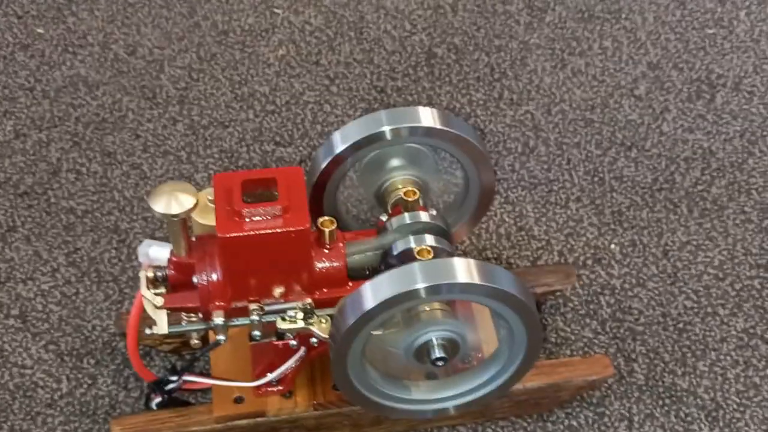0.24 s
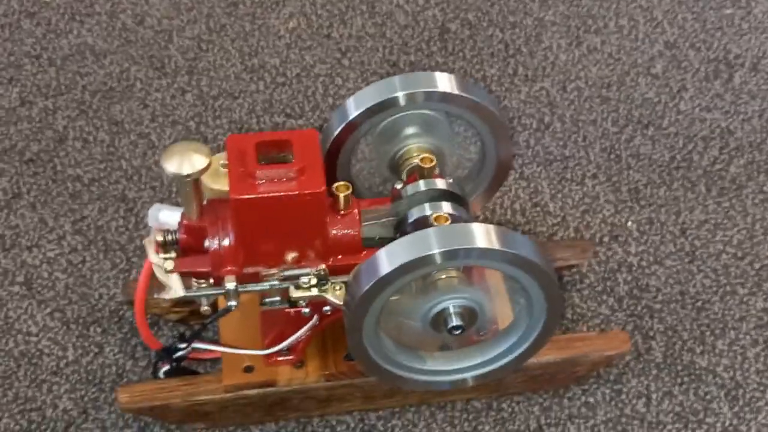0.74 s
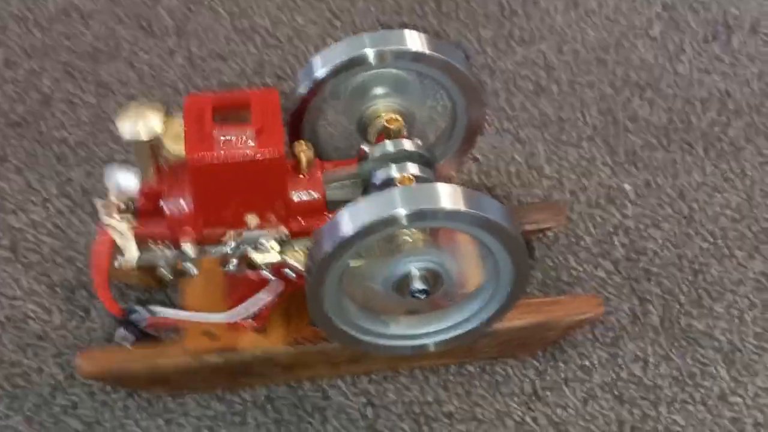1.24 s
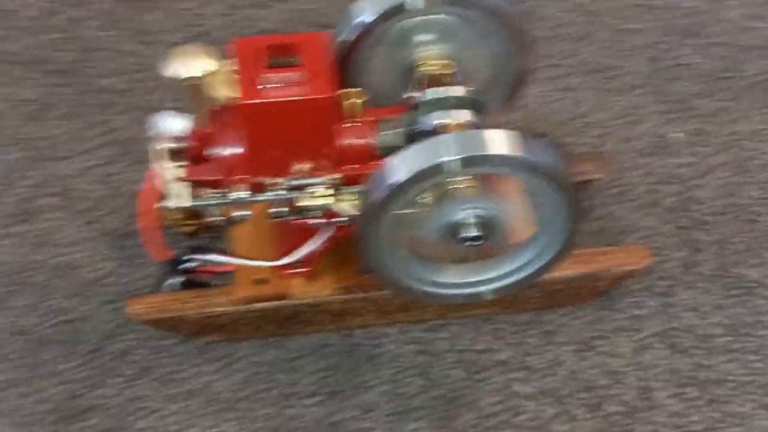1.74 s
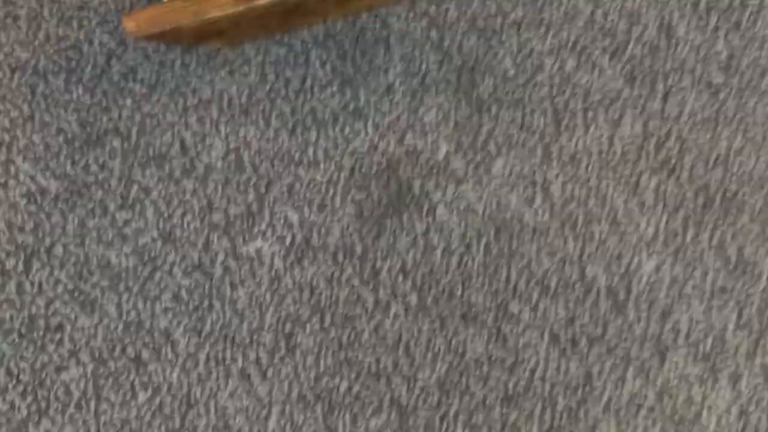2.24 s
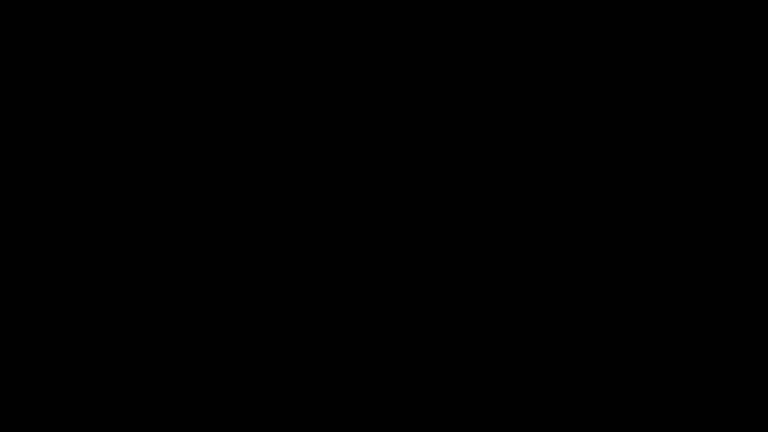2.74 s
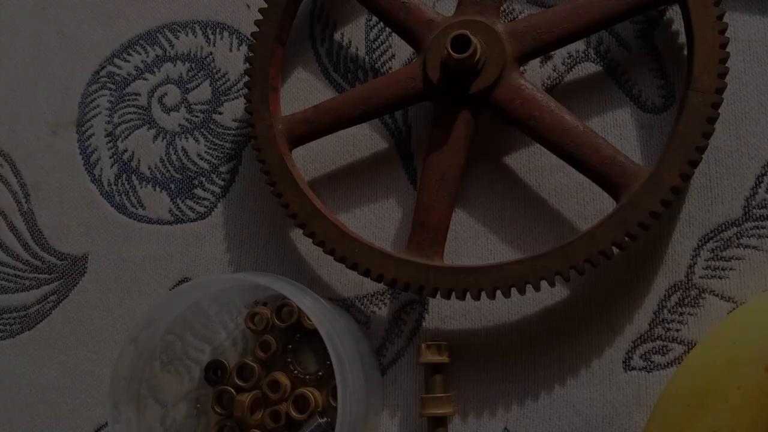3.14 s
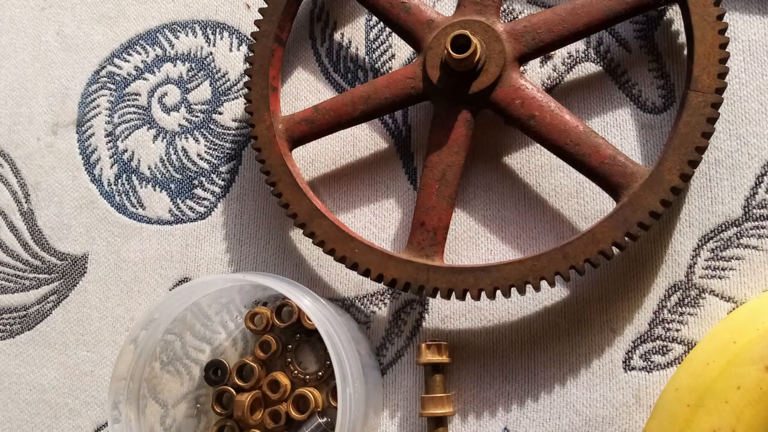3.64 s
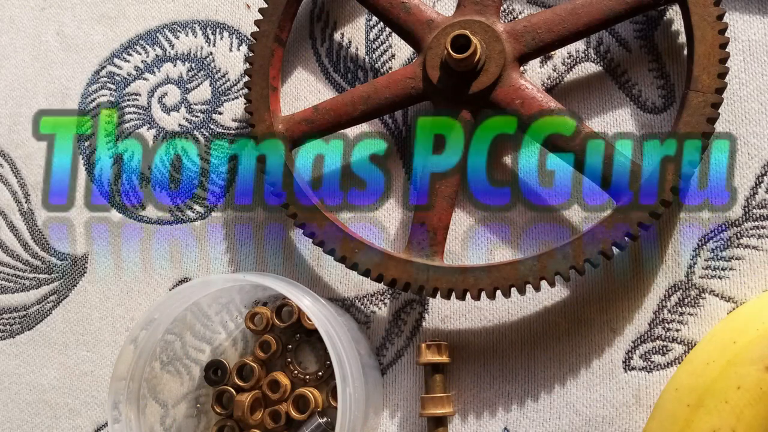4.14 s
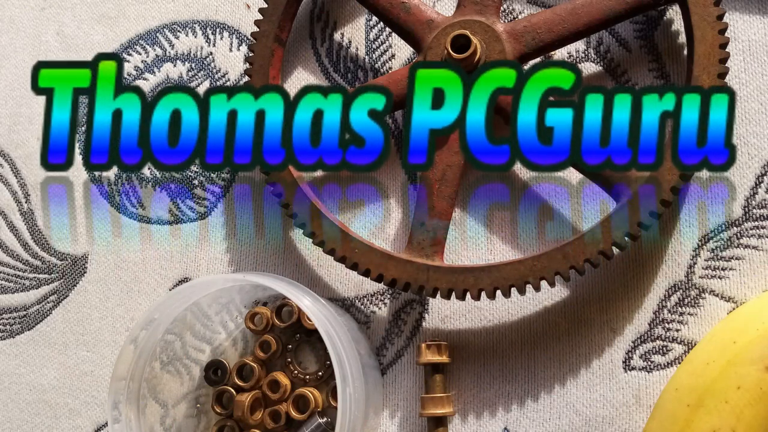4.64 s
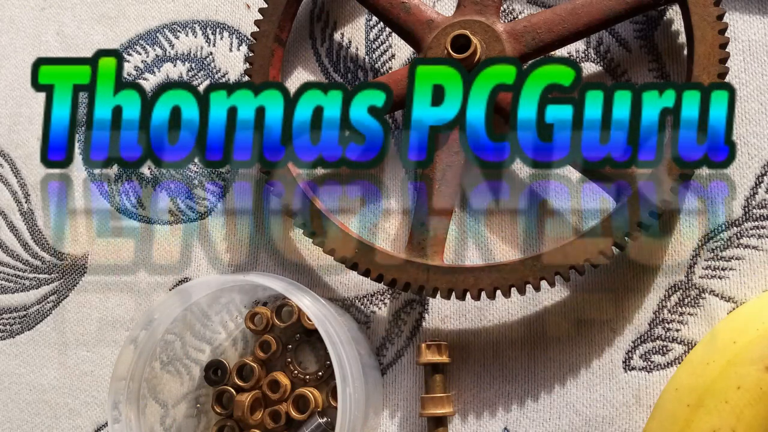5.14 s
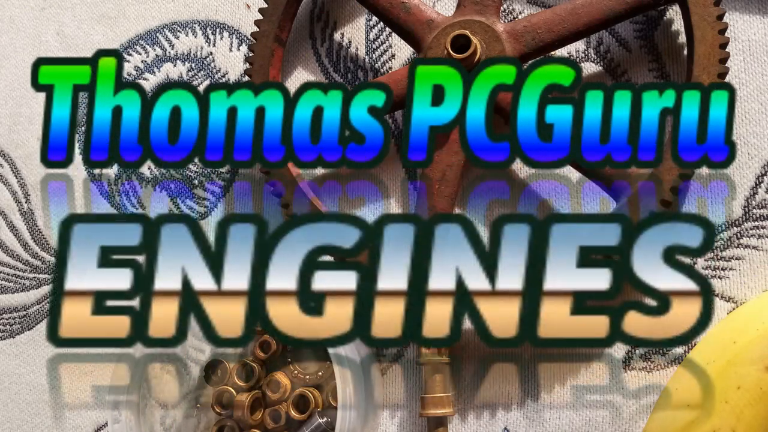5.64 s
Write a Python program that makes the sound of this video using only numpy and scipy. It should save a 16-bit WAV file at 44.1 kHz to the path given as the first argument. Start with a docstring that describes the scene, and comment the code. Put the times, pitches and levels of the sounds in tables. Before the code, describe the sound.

A model hit-and-miss engine runs on carpet indoors, close to the right microphone of a handheld camera. Faint slowing coasting leads to soft accelerating chuffs, then crisp valve-gear ticking with a rhythmic swish. Fingers knock and rub the camera case, ticking slows, and a dozen sharp pops speed the engine up before it coasts and ticks again. The left side stays nearly silent apart from handling and faint room sound.

```python
"""Indoors, on a carpet: a model hit-and-miss engine runs close to the right port of a hand-held camera.
It coasts, its push rod and valve gear ticking once a cycle (short coloured noise and damped frame modes),
then fires a run of strokes and speeds up again: soft noise chuffs while the exhaust points away, sharp pops
of ringing port, low blast and gas jet when it faces the camera. Moving parts swish in step with the crank.
Fingers knock and rub on the case: damped shell modes and noise."""
import sys
import numpy as np
from scipy import signal
from scipy.fft import rfft, irfft, next_fast_len
from scipy.io import wavfile
from scipy.ndimage import uniform_filter1d

SR = 44100
rng = np.random.default_rng(int(sys.argv[2]) if len(sys.argv) > 2 else 0)


def store_wav(level_fs):
    """Save 16-bit WAV to argv[1]."""
    pcm = np.round(np.clip(np.atleast_2d(level_fs), -1, 1) * 32767)
    wavfile.write(sys.argv[1], SR, pcm.T.astype(np.int16))


N = 259749
T = np.arange(SR // 3) / SR  # time since a blow [s]
NOW = np.arange(N) / SR  # time in the scene [s]
FULL_HZ = 16  # full speed [cycles per s]
AIR_HZ = 7500  # the treble above this has its own level [Hz]

# firing strokes: (time [s], strength [dB])
FIRING = [(.702, -14.5), (.811, -15), (.918, -16), (1.017, -15.5), (1.105, -11.5), (1.181, -10),
          (1.256, -10.5), (1.325, -6), (1.386, -5.5), (1.449, -7), (3.4153, -8), (3.5321, -7),
          (3.6448, -7.5), (3.7439, -7), (3.8335, -7.5), (3.9156, -8.5), (3.992, -7), (4.065, -6),
          (4.1339, -8.5), (4.2004, -10.5), (4.2636, -11), (4.386, -11.5)]
# aim of the exhaust, away at first and later at the camera: (time [s], direct pop [dB], chuff [dB])
AIM = [(1.5, -50, -18.5), (3.4, 0, -26.5), (4.4, 0, -27)]
# the valve gear heard from the moving camera:
# (time [s], latch [dB], clack [dB], frame ring [dB], brightness [dB])
VIEW = [(0, -54, -54, -68, -6), (.6, -53, -52, -47, -8.5), (1.5, -21, -26, -30, -4),
        (1.67, -13.5, -23.5, -37, -5), (1.83, -27.5, -33, -39, -4), (2.15, -14.5, -17.5, -25.5, -6),
        (2.6, -21.5, -19.5, -22.5, -5.5), (2.9, -23.5, -19.5, -32.5, -10.5), (3.3, -25.5, -18, -26.5, -10),
        (4, -27, -39, -16.5, -5), (4.38, -30, -26, -30.5, -4), (4.56, -17.5, -22.5, -26.5, -0.5),
        (4.85, -18.5, -28.5, -25, -6.5), (5.15, -22.5, -25, -27.5, 1.5), (5.6, -20.5, -21.5, -27, 4.5),
        (5.88, -19.5, -19, -30, 1)]
# colour of the valve gear landing: (frequency [Hz], relative density [dB per Hz])
CLACK = [(550, -45), (850, -9), (1200, -4), (2200, 14.5), (2900, -9), (3700, 8), (4400, -5), (5300, 9),
         (6500, -8.5), (7600, 1.5), (9000, -1.5), (12000, 3), (16000, -6.5)]
# colour of the latch and the push rod: (frequency [Hz], relative density [dB per Hz])
LATCH = [(550, -23), (850, -20), (1150, 8), (1700, -6), (2300, 6), (3000, -0.5), (3800, 8.5), (4700, -13),
         (5800, 10.5), (6700, 15), (7500, -14), (9000, -9), (12000, -5.5), (16000, -11.5)]
# dull wash of engine air in the room: (frequency [Hz], relative density [dB per Hz])
WASH = [(60, -11), (110, 14), (180, -2), (260, 5), (400, -7.5), (700, -9), (1400, -8), (2000, -7.5),
        (3000, -24), (5000, -11), (8000, -23), (16000, -22)]
# low modes of the camera case: (frequency [Hz], level [dB], t60 [s])
CASE = [(66.6, -5.5, 0.12), (89.5, -3, 0.18), (182, -4, 0.039)]
# creak of the shell under a finger: (frequency [Hz], relative density [dB per Hz])
CRACKLE = [(300, -14), (1000, 5.5), (1800, -0.5), (2500, 3), (3400, 8), (4000, -11), (4700, -15),
           (6500, -4), (15000, -46)]


def amp(db):
    """dB to gain."""
    return 10 ** (np.asarray(db) / 20)


def unit(x):
    """Scale to rms 1."""
    return x / np.sqrt(np.mean(x ** 2) + 1e-20)


def along(points, hz):
    """(Hz, value) points read on a log frequency axis."""
    f, v = np.transpose(points)
    return np.interp(np.log(hz + 1), np.log(f), v)


def at(curve, s):
    """The columns of a curve at a time."""
    times, *cols = np.transpose(curve)
    return [np.interp(s, times, c) for c in cols]


def noise(spectrum, size, lo=0, hi=SR):
    """Coloured noise of rms 1 between two frequencies."""
    m = next_fast_len(size)
    hz = np.fft.rfftfreq(m, 1 / SR)
    gain = amp(along(spectrum, hz)) * (hz >= lo) * (hz < hi)
    return unit(irfft(rfft(rng.standard_normal(m)) * gain, m)[:size])


def fade(t60):
    """Exponential decay by 60 dB in t60 seconds."""
    return np.exp(-np.log(1000) * T / t60)


def swell(length, rise, t60):
    """Opens, holds for a length of time and dies away."""
    return (1 - np.exp(-T / rise)) * np.exp(-np.log(1000) * np.maximum(T - length, 0) / t60)


def onset(rise):
    """A soft start, as a body takes up a push."""
    return 1 - np.exp(-(T / rise) ** 2)


def ring(modes, scatter_db, detune):
    """Damped modes, a little different in level and pitch at every blow."""
    out = np.zeros(len(T))
    for hz, db, t60 in modes:
        gain = amp(db + scatter_db * rng.normal())
        mode_hz = hz * (1 + detune * rng.normal())
        out += gain * fade(t60) * np.sin(2 * np.pi * mode_hz * T)
    return out


def add(track, s, sound):
    """Mix a sound in at a time."""
    i = max(round(s * SR), 0)
    space = track[..., i:i + sound.shape[-1]]
    space += sound[..., :space.shape[-1]]


def coasting_ticks():
    """Between firings the flywheels lose speed to steady friction and to drag that grows with speed."""
    # spells of coasting:
    # (first tick [s], rate [cycles per s], bearing friction [Hz per s], number of cycles)
    spells = [(.0629, 10.56, 3.25, 6), (1.5081, 16.512, 3.21, 23), (4.3236, 16.1, 3.25, 1),
              (4.4472, 16.74, 3.255, 20)]
    drag_per_s = .1258
    ticks = []
    for s, rate, friction, count in spells:
        for _ in range(count):
            ticks.append(s)
            s, rate = s + 1 / rate, rate - (friction + drag_per_s * rate) / rate
    return ticks


def cycle_starts():
    """The start of every cycle, fired or not."""
    return np.sort(coasting_ticks() + [s for s, _ in FIRING])


def period(s):
    """Length of the engine cycle at a time, interpolated between cycle starts."""
    starts = cycle_starts()
    return np.interp(s, starts[:-1], np.diff(starts))


def speed(s):
    """Engine speed in doublings from full speed."""
    return -np.log2(period(s) * FULL_HZ)


def coasting():
    """1 while the governor holds the valve open, 0 while the engine fires, gliding between cycles."""
    return np.interp(NOW, cycle_starts(), np.isin(cycle_starts(), coasting_ticks()))


def cycles_so_far():
    """Running count of engine cycles; its fraction is the place in the cycle."""
    starts = cycle_starts()
    marks = np.concatenate([[starts[0] - period(0)], starts, [starts[-1] + period(starts[-1])]])
    return np.interp(NOW, marks, np.arange(len(marks)))


def pulse(cycles, share, width):
    """A smooth swell once a cycle; place and width are shares of the cycle."""
    return np.exp(-(((cycles - share + .5) % 1 - .5) / width) ** 2)


def still_room():
    """The faint rumble of the room: separate coloured noise at each port."""
    # (frequency [Hz], relative density [dB per Hz])
    still = [(20, -19), (45, -16), (85, 8), (160, -13.5), (400, -15), (1500, -29.5), (15000, -39)]
    return amp(-60.5) * np.array([noise(still, N), noise(still, N)])


def room(x):
    """A carpeted room: decaying noise makes a short tail, shortest near 6 kHz."""
    # (frequency [Hz], t60 [s])
    decay = [(150, 0.68), (1500, 0.87), (6000, 0.2), (15000, 0.5)]
    hz, t, z = signal.stft(rng.standard_normal(len(T)), SR, nperseg=256)
    envelope = np.exp(-np.log(1000) * t / along(decay, hz)[:, None])
    tail = signal.istft(z * envelope, SR, nperseg=256)[1][:len(T)]
    tail = tail * (1 - np.exp(-T / 0.0011))
    return signal.fftconvolve(x, tail / np.linalg.norm(tail))[:N]


def case_knocks():
    """Fingers strike the case: its low modes thump, the shell rings, and a short noise crackles."""
    # (time [s], knock [dB], crackle [dB], thump [dB], left port [dB])
    knocks = [(2.027, -38, -14, -30, 5), (2.0886, -3.5, -9.5, -19, -5.5), (2.0969, -30, -11, -21.5, 16),
              (2.106, -26, -15, -17.5, 9), (2.1136, -15, -13, -19, -3), (2.147, 0.5, -24, -16.5, -26),
              (2.5398, -10, -21.5, -54, -22), (2.851, -25, -33, -44, -16), (4.4742, -19, -18, -24, -27)]
    # the camera's plastic shell: (frequency [Hz], level [dB], t60 [s])
    shell = [(450, -1, 0.013), (770, 2.5, 0.0051), (1210, -4, 0.0069), (1680, -14, 0.0048)]
    out = np.zeros((2, N))
    for s, knock_db, crackle_db, thump_db, left_db in knocks:
        knock = amp(knock_db) * ring(shell, scatter_db=1.5, detune=.08) * onset(rise=.0002)
        crackle = amp(crackle_db + 2) * noise(CRACKLE, len(T)) * fade(0.011)
        thump = amp(thump_db - 1.5) * ring(CASE, scatter_db=6.5, detune=0.075) * onset(rise=0.0049)
        # hardly any crackle reaches the left port
        left = amp(left_db) * (thump + amp(-2) * knock + amp(-38) * crackle)
        add(out, s, np.array([left, thump + knock + crackle]))
    return out


def grip_bumps():
    """Dull bumps as the grip shifts: low case modes with a soft start."""
    # (time [s], left port [dB], right port [dB])
    bumps = [(1.963, -27, -51), (2.251, -56, -24.5), (2.654, -47, -25), (4.792, -51, -28.5),
             (5.434, -39, -30.5)]
    out = np.zeros((2, N))
    for s, left_db, right_db in bumps:
        bump = ring(CASE, scatter_db=6, detune=.08) * onset(rise=0.0068)
        add(out, s, amp([[left_db], [right_db]]) * bump)
    return out


def shell_squeeze():
    """The squeezed shell crackles by the right port: noise snaps of uneven level and spacing."""
    start_s, length_s, snaps_per_s = 2.09, 0.028, 200
    out = np.zeros((2, N))
    for s in np.arange(start_s, start_s + length_s, 1 / snaps_per_s):
        snap = amp(-11.5 + 5 * rng.normal()) * noise(CRACKLE, len(T)) * fade(0.01)
        add(out, s + rng.uniform(-0.63, 0.71) / snaps_per_s, snap * amp([[-24], [0]]))
    return out


def finger_rubs():
    """Fingers slide on the case: swells of noise, strongest at the right port."""
    # (time [s], level [dB], length [s])
    rubs = [(2.028, -30, 0.033), (2.08, -26, 0.045), (2.239, -36.5, 0.034), (2.56, -37, 0.144),
            (2.762, -33, 0.098)]
    # (frequency [Hz], relative density [dB per Hz])
    skin = [(60, -3), (200, -0.5), (500, 12.5), (900, 8.5), (1700, 8.5), (3300, -7), (5000, -40),
            (15000, -18)]
    out = np.zeros((2, N))
    for s, db, length in rubs:
        rub = noise(skin, len(T)) * swell(length, rise=0.0057, t60=0.073)
        add(out, s, amp(db - 2.5) * rub * amp([[-20], [0]]))
    return out


def handling():
    """All that the hand does to the camera, as left and right ports."""
    return case_knocks() + grip_bumps() + shell_squeeze() + finger_rubs()


def skid_rumble(cycles, rate):
    """Low rumble and gear hum, at multiples of the cycle rate, come through the wooden skid."""
    # (time [s], level [dB])
    skid_level = [(0, -75.5), (.62, -88), (1.35, -46), (1.65, -56), (2.6, -55.5), (3.2, -69), (3.8, -57),
                  (4.25, -43.5), (4.9, -50.5), (5.85, -57.5)]
    # (frequency [Hz], relative density [dB per Hz])
    rumble = [(40, -16), (85, 3.5), (140, -6), (220, -9.5), (330, 6), (480, -7), (750, -13.5),
              (1200, -25.5)]
    # (multiple of the cycle rate, relative level [dB])
    gear_orders = [(20, 0), (24, -8), (26, -5), (28, -9), (30, -4)]
    # how the skid passes the hum on: (frequency [Hz], level [dB])
    skid = [(150, -26), (250, -9), (330, -1), (450, -8), (650, -22)]
    hum = np.zeros(N)
    for order, db in gear_orders:
        hum += amp(db + along(skid, order * rate)) * np.sin(2 * np.pi * order * cycles)
    return amp(at(skid_level, NOW)[0]) * (amp(-0.5) * noise(rumble, N) + amp(0.5) * hum)


def swish(cycles, whirr_gain):
    """Piston, bearings and gears: gritty noise that follows the friction around each cycle."""
    # (frequency [Hz], relative density [dB per Hz])
    whirr = [(350, -50), (600, -55), (727, -46), (906, 1), (1030, 0), (2180, 0.5), (2910, -3.5), (3630, -3),
             (4220, -11), (4710, -5.5), (6120, 2), (8390, -11.5), (11300, -10.5), (13200, -10),
             (16000, -13.5)]
    # friction around one cycle of two turns: (share of the cycle, relative level [dB])
    stroke = [(0, 9.5), (.08, 5), (.16, 3), (.3, 7), (.42, 1.5), (.52, -7.5), (.6, 5.5), (.66, 9),
              (.74, -6.5), (.8, -3), (.88, 3), (.96, -14)]
    bright_share = 0.73  # how much the hiss follows the brightness of the ticks
    hiss_db = -37.5 + 12 * speed(NOW) + bright_share * at(VIEW, NOW)[-1]
    hiss_gain = amp(hiss_db - (1 - coasting()))  # 1 dB down while firing
    stroke_db = np.interp(cycles % 1, *np.transpose(stroke), period=1)
    grit = amp(2.74 * unit(uniform_filter1d(rng.standard_normal(N), size=60)))
    low = whirr_gain * noise(whirr, N, hi=AIR_HZ) * amp(0.55 * stroke_db - 3.0)
    high = hiss_gain * noise(whirr, N, lo=AIR_HZ) * amp(0.96 * stroke_db - 5.5)
    return (low + high) * grit


def port_air(cycles, rate):
    """With the valve held open the piston pumps air in narrow hisses, louder at speed."""
    # (share of the cycle, width [share of the cycle], pitch [Hz], level [dB])
    pumping = [(.1, 0.13, 3540, 0), (.62, 0.078, 3170, -1.5), (.7, 0.085, 2370, -5)]
    out = np.zeros(N)
    for share, width, hz, db in pumping:
        # each hiss climbs to a sharp upper edge just below its pitch
        band = noise([(hz * 0.62, -30), (hz * 0.94, -7.43), (hz * 0.9401, -30)], N)
        out += amp(db) * band * pulse(cycles, share, width)
    return out * coasting() * (rate / FULL_HZ) ** 3


def whistle(cycles):
    """Near full speed the air leaves the port with a very high, directional hiss once a cycle."""
    # (frequency [Hz], relative density [dB per Hz])
    whistling = [(7000, -39), (10000, -17), (12500, 11), (15500, 5)]
    # 50 dB per doubling of speed, growing no further above full speed
    db = -28.5 + 50 * np.minimum(speed(NOW), 0) + at(VIEW, NOW)[-1]
    return amp(db) * noise(whistling, N) * pulse(cycles, share=0.32, width=0.13)


def running_noise():
    """Swish, pumped air, whistle and rumble keep step with the crank."""
    cycles = cycles_so_far()
    rate = 1 / period(NOW)
    whirr_gain = amp(-37.5 + 10.5 * speed(NOW))  # 10.5 dB per doubling of speed
    moving = swish(cycles, whirr_gain) + whirr_gain * port_air(cycles, rate)
    return moving + whistle(cycles) + skid_rumble(cycles, rate)


def tick(spectrum, s, bright_db, t60):
    """A steel contact: noise for dense modes that die in milliseconds, coloured by the camera's place."""
    # presence near 5 kHz rises and falls as the camera swings round: (time [s], level [dB])
    presence = [(0, 3), (2.45, -11), (2.75, 4), (3.0, 5.5), (3.6, 10), (4.4, -2.5), (5.85, 13)]
    size = len(T) // 4
    presence_db = np.interp(s, *np.transpose(presence))
    seen = [(hz, db + presence_db * (np.exp(-((hz - 4900) / 800) ** 2) - .25)) for hz, db in spectrum]
    colour = noise(seen, size, hi=AIR_HZ) + amp(bright_db) * noise(seen, size, lo=AIR_HZ)
    envelope = fade(t60) * (1 - np.exp(-T / .0012))
    return amp(4.0) * colour * envelope[:size]


def add_valve(track, landing, clack_db, ring_db, bright_db):
    """The valve gear lands, bounces twice and rings the frame at every contact."""
    # (frequency [Hz], level [dB], t60 [s])
    frame = [(1177, -5.5, 0.02), (1317, -1.5, 0.027), (1786, -10.5, 0.042), (2150, -9, 0.014)]
    s = landing
    for k in range(3):
        contact_db = clack_db + 2 - k * 2.5  # the clack loses 2.5 dB per contact
        add(track, s, amp(contact_db) * tick(CLACK, landing, bright_db, t60=0.0073))
        frame_ring = ring(frame, scatter_db=1.5, detune=0.026) * onset(rise=0.001)
        add(track, s, amp(ring_db + 0.5) * frame_ring)
        s += .0034 + .0004 * rng.normal()


def coasting_gear():
    """The cam trips the latch, the push rod slaps (hard only at speed), and the valve gear falls back."""
    slap_at, landing_at = .105, 0.18  # shares of the cycle
    out = np.zeros(N)
    for s in coasting_ticks():
        latch_db, clack_db, ring_db, bright_db = at(VIEW, s) + 0.07 * rng.standard_normal(4)
        slap_db = latch_db - 0.5 + 21 * speed(s)  # 21 dB per doubling of speed
        add(out, s, amp(latch_db - 1.5) * tick(LATCH, s, bright_db + 2.5, t60=.011))
        add(out, s + slap_at * period(s), amp(slap_db) * tick(LATCH, s, bright_db, t60=0.014))
        add_valve(out, s + landing_at * period(s), clack_db, ring_db, bright_db)
    return out


def firing_gear():
    """The ignition contact scrapes before each firing; afterwards the exhaust valve snaps shut."""
    # the exhaust valve on its seat: (frequency [Hz], level [dB], t60 [s])
    seat = [(1515, 3, 0.015), (1910, -7, 0.014)]
    contact_lead, landing_at = .2, .26  # shares of the cycle
    aim_share = 0.17  # how much the valve seat follows the aim of the exhaust
    out = np.zeros(N)
    for s, _ in FIRING:
        _, clack_db, ring_db, bright_db = at(VIEW, s)
        pop_db, _ = at(AIM, s)
        scrape = amp(clack_db - 9) * tick(CLACK, s, bright_db=-13.0, t60=0.016)
        add(out, s - contact_lead * period(s), scrape)
        landing = s + landing_at * period(s)
        add_valve(out, landing, clack_db - 8, ring_db - 8.5, bright_db)
        snap = ring(seat, scatter_db=5.5, detune=0.026) * onset(rise=0.0023)
        add(out, landing, amp(-20 + aim_share * pop_db) * snap)
    return out


def governor_clicks():
    """The governor weights click at low speed."""
    # (time [s], level [dB])
    clicks = [(.1582, -32), (.3602, -32), (.4681, -30)]
    out = np.zeros(N)
    for s, db in clicks:
        add(out, s, amp(db) * tick(LATCH, s, bright_db=-3, t60=0.0082))
    return out


def mixer_gulps():
    """Air gulped through the mixer before a run of firings: a soft swell of dull noise."""
    # (time [s], level [dB], length [s])
    gulps = [(0.622, -50.5, 0.052), (3.324, -30, 0.027)]
    out = np.zeros(N)
    for s, db, length in gulps:
        add(out, s, amp(db) * noise(WASH, len(T)) * swell(length, rise=0.015, t60=0.047))
    return out


def add_flaps(track, s, pop_db):
    """Later in a firing cycle the sprung intake valve buzzes as it draws the next charge."""
    # (frequency [Hz], level [dB], t60 [s])
    flap_modes = [(327, 1, 0.009), (805, -9, 0.0055), (1600, -6, 0.0044)]
    start = s + .40 * period(s)
    for k in range(3):
        flap = ring(flap_modes, scatter_db=4.0, detune=0.089) * onset(rise=0.00042)
        add(track, start + (k + 0.152 * rng.normal()) * .0095, amp(pop_db - 17) * flap)


def port_crack():
    """The sharp part of a pop: the port rings and a jet of gas bursts out."""
    # (frequency [Hz], level [dB], t60 [s])
    port = [(1600, 0.5, 0.0047), (417, -5.5, 0.0085)]
    # (frequency [Hz], relative density [dB per Hz])
    jet_colour = [(300, -9.5), (1500, 2.5), (2100, 10), (3000, -14), (4500, 6), (6800, -4), (8000, -4.5),
                  (9500, 0.5), (12000, -3.5), (13500, -4), (15500, -2)]
    jet = noise(jet_colour, len(T)) * np.exp(-((T - .0023) / 0.0018) ** 2)
    port_ring = ring(port, scatter_db=2.1, detune=0.055) * onset(rise=.0001)
    return amp(-0.5) * port_ring + amp(-8.5) * jet


def pop_body():
    """The low part of a pop: blast, booming room modes and a wash of air."""
    # low blast: (frequency [Hz], level [dB], t60 [s])
    blast_modes = [(141, 5.5, 0.021), (96.6, -7.5, 0.11)]
    # (frequency [Hz], level [dB], t60 [s])
    room_modes = [(75.5, -21, 0.16), (98.7, -18, 0.23), (179.4, -33, 0.35), (210, -24, 0.054),
                  (266, -21.5, 0.074), (386, -25.5, 0.061)]
    # the pressure spike is followed by a suction, so the blast swings negative first
    blast = -ring(blast_modes, scatter_db=1.5, detune=0.032) * onset(rise=0.0032)
    boom = ring(room_modes, scatter_db=1, detune=0.02) * onset(rise=0.0031)
    wash = noise(WASH, len(T)) * swell(0.045, rise=0.0013, t60=0.18)
    return amp(1.0) * blast + amp(6) * boom + amp(-27.5) * wash


def chuff(s):
    """A sputtering puff of coloured noise that holds for half a cycle."""
    # (frequency [Hz], relative density [dB per Hz])
    chuff_colour = [(60, -41), (150, -9.5), (280, 5.5), (420, 5), (720, -9.5), (1050, 1.5), (1500, 2),
                    (1950, 0.5), (2700, -24), (3500, -3.5), (4400, -16), (6200, -1), (7600, -15),
                    (9500, -8.5), (12500, -11), (16000, -19)]
    sputter = amp(4.75 * unit(uniform_filter1d(rng.standard_normal(len(T)), size=110)))
    return noise(chuff_colour, len(T)) * sputter * swell(.5 * period(s), rise=0.0025, t60=0.15)


def exhaust():
    """Each firing pops at the port, reflects nearby and fills the room with a chuff."""
    # reflections from the floor and nearby furniture: (delay [s], level [dB])
    echoes = [(.006, -22), (0.011, -23), (.024, -38), (.041, -19), (0.047, -28)]
    out = np.zeros(N)
    for s, strength_db in FIRING:
        pop_db, chuff_db = np.add(strength_db, at(AIM, s))
        crack = port_crack()
        add(out, s, amp(pop_db) * (crack + pop_body()))
        add_flaps(out, s, pop_db)
        for delay, db in echoes:
            add(out, s + delay, amp(pop_db + db) * crack)
        add(out, s, amp(chuff_db - 7) * chuff(s))
    return out


def scene():
    """The engine reaches the right port directly and the left only faintly, by way of the room."""
    valve_gear = coasting_gear() + firing_gear() + governor_clicks()
    engine = running_noise() + valve_gear + mixer_gulps() + exhaust()
    left = amp(-42.5) * room(engine)
    right = amp(5.5) * (engine + amp(-13.0) * room(engine))
    return still_room() + handling() + np.array([left, right])


def record(dry):
    """The microphone drops the deep bass, the loudest peaks round off, and the top is cut at 16050 Hz."""
    thin = signal.sosfilt(signal.butter(2, 45, "highpass", fs=SR, output="sos"), dry)
    soft = thin / (1 + (thin / .85) ** 6) ** (1 / 6)
    m = next_fast_len(N + SR // 4)
    return irfft(rfft(soft, m) * (np.fft.rfftfreq(m, 1 / SR) < 16050), m)[:, :N]


dry = scene()
out = record(dry)
store_wav(out)
```